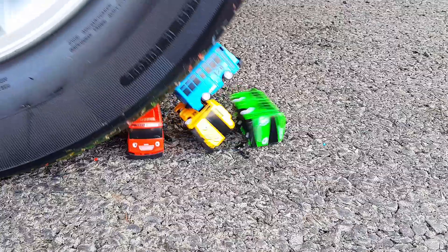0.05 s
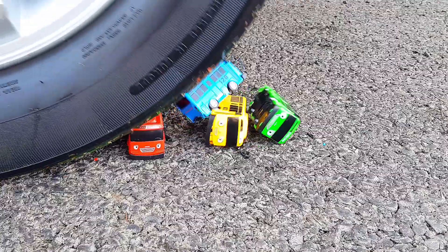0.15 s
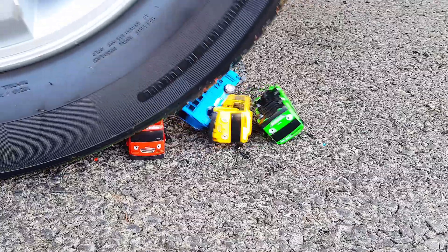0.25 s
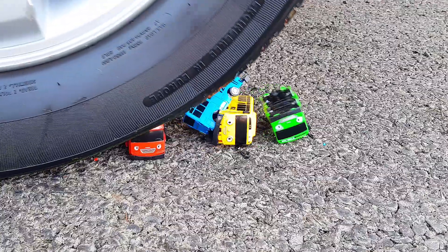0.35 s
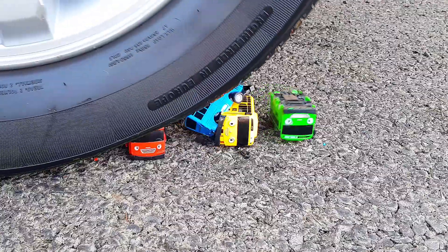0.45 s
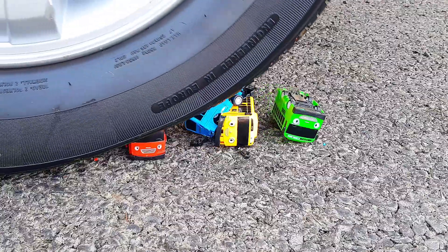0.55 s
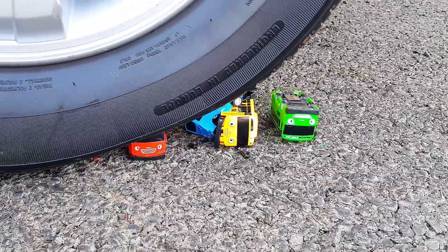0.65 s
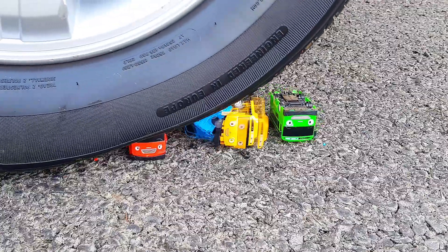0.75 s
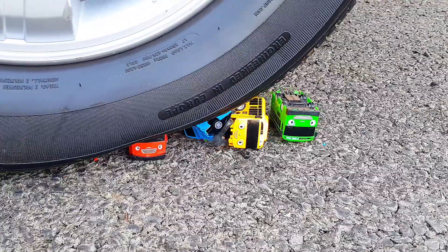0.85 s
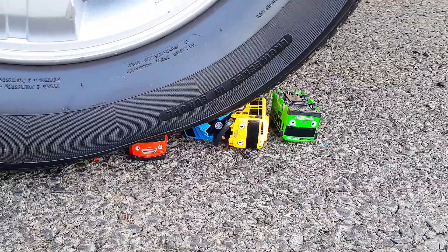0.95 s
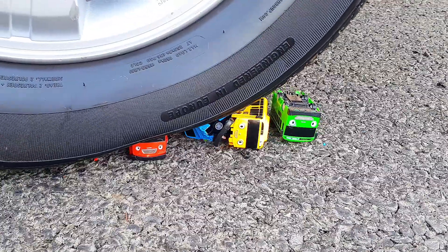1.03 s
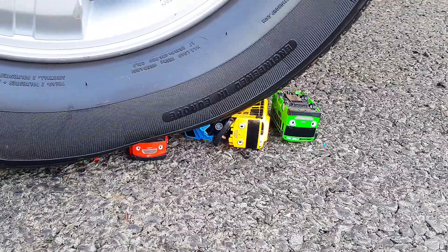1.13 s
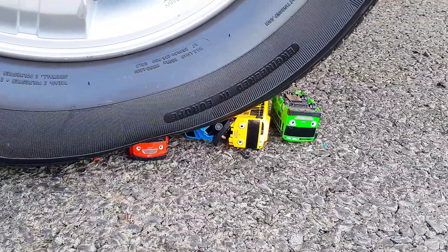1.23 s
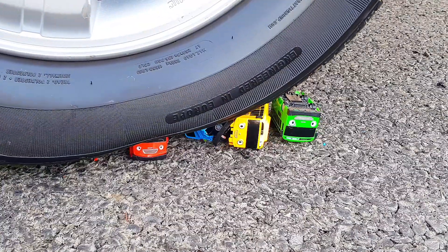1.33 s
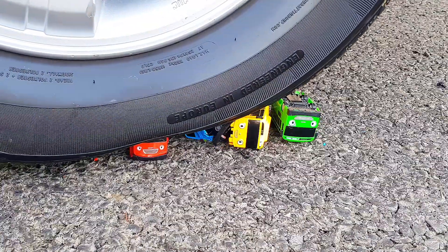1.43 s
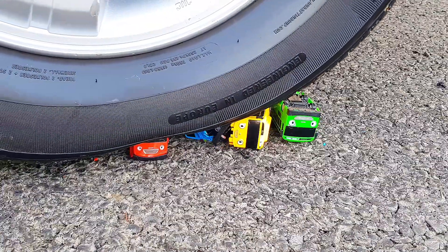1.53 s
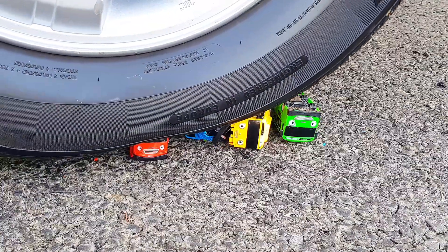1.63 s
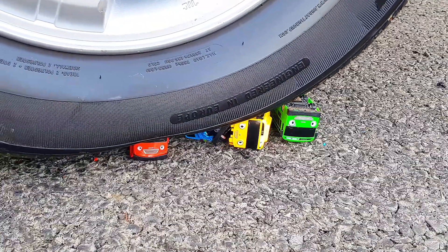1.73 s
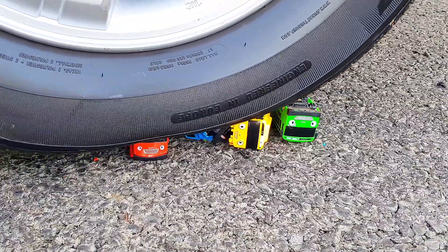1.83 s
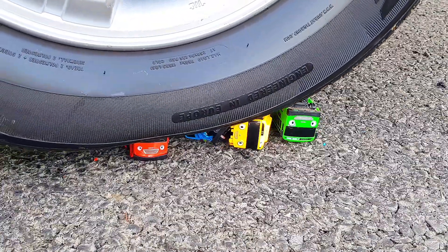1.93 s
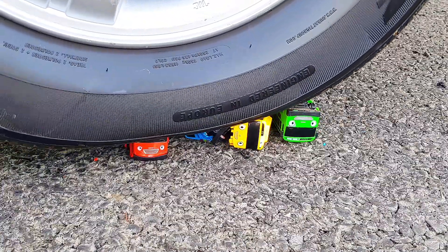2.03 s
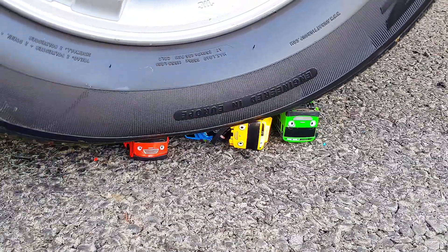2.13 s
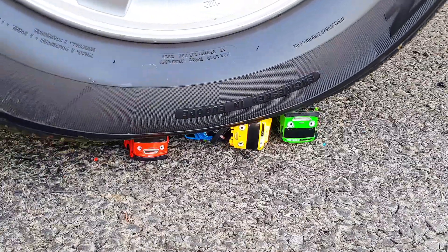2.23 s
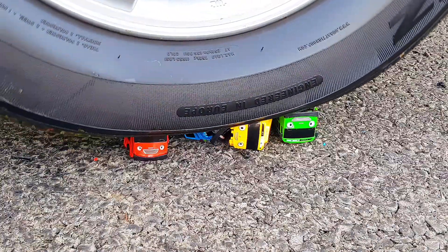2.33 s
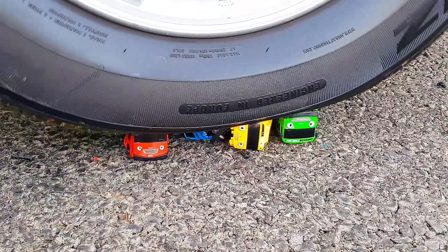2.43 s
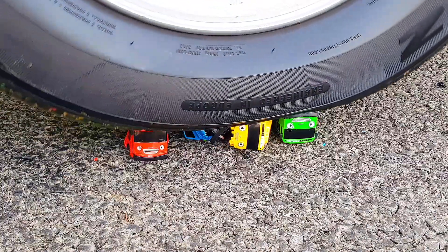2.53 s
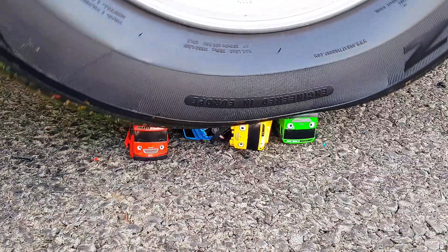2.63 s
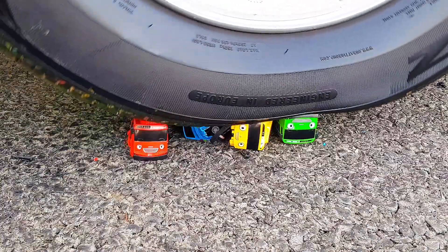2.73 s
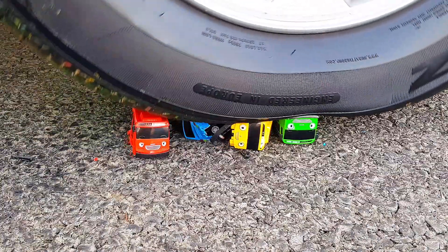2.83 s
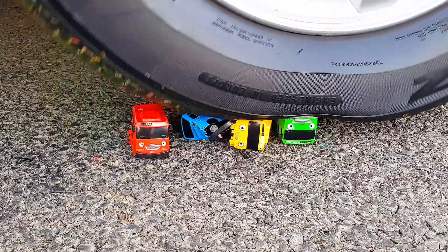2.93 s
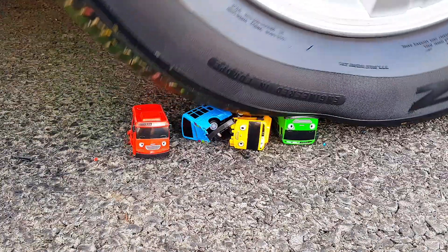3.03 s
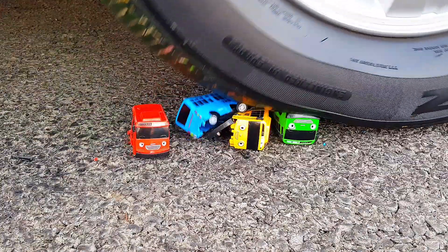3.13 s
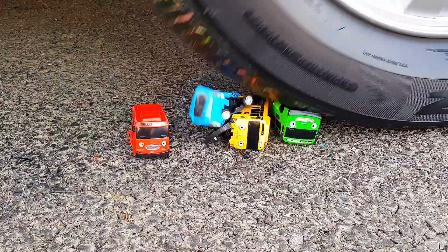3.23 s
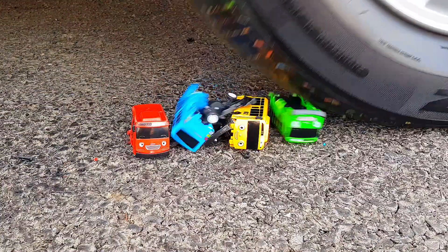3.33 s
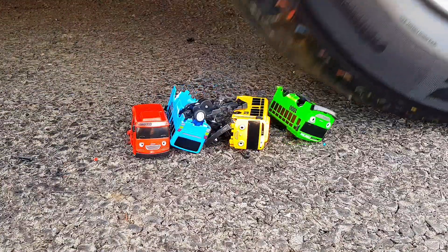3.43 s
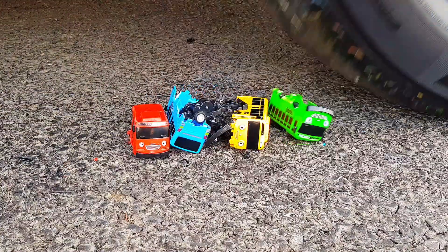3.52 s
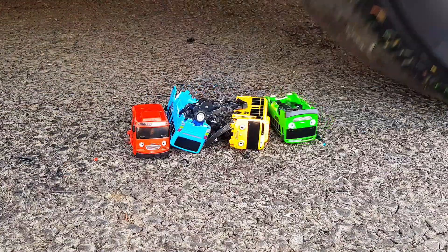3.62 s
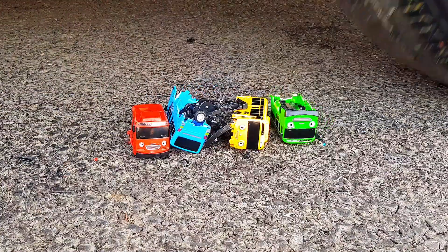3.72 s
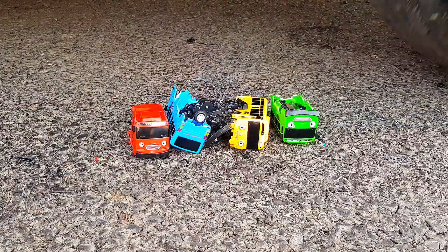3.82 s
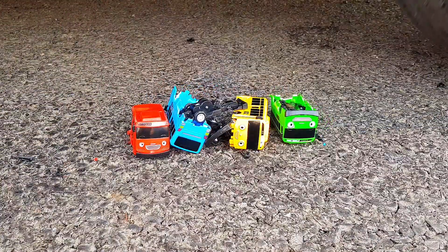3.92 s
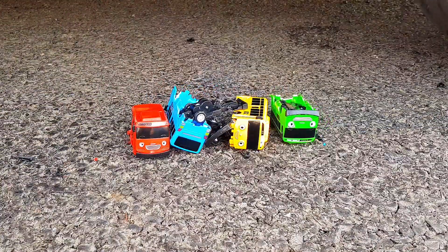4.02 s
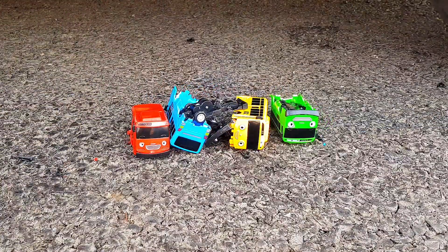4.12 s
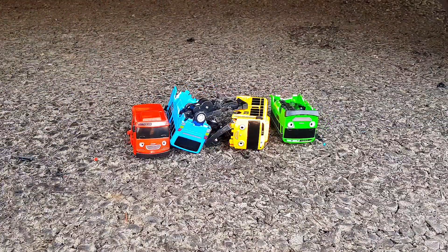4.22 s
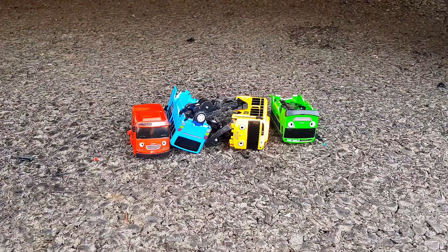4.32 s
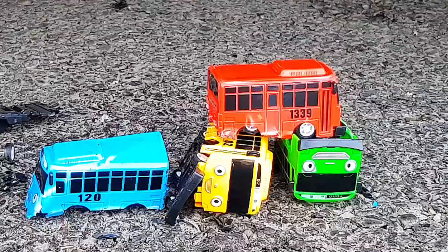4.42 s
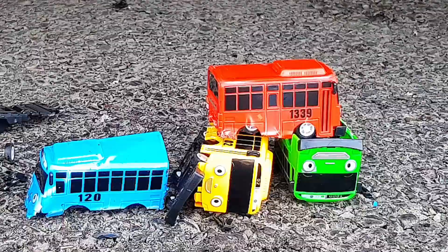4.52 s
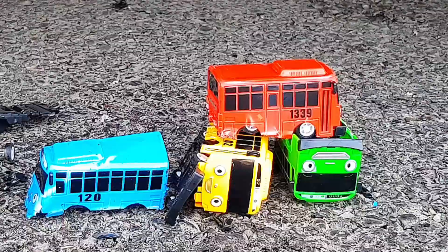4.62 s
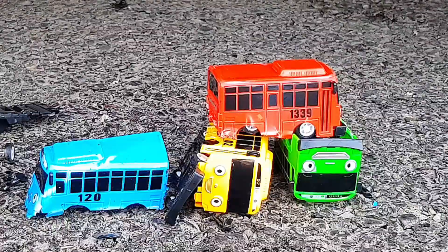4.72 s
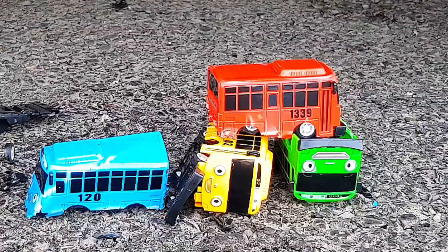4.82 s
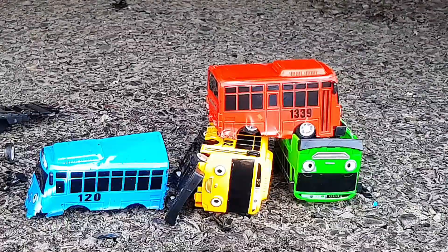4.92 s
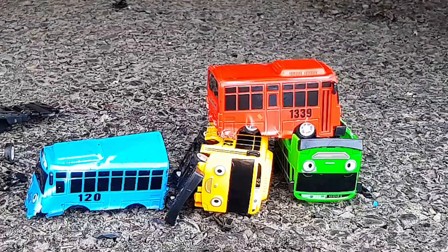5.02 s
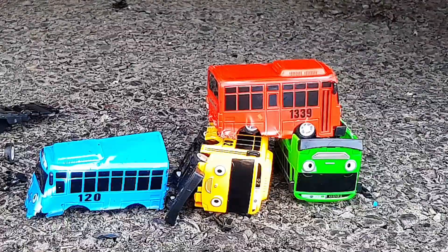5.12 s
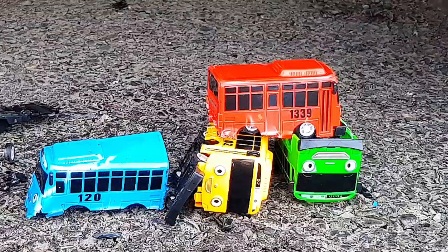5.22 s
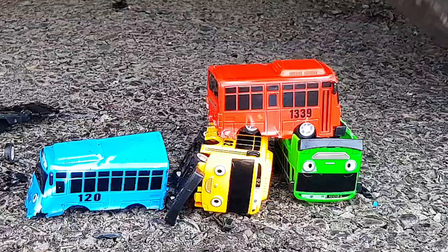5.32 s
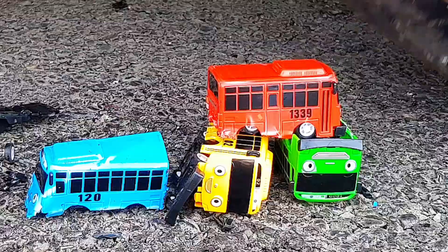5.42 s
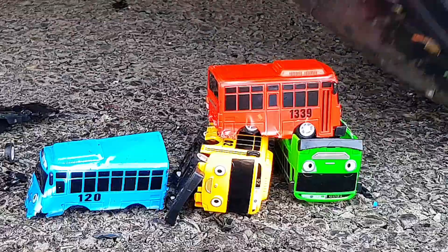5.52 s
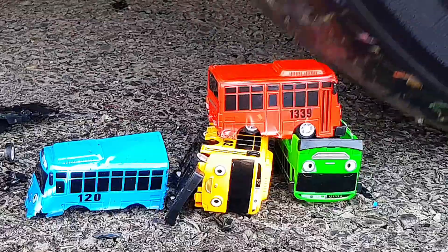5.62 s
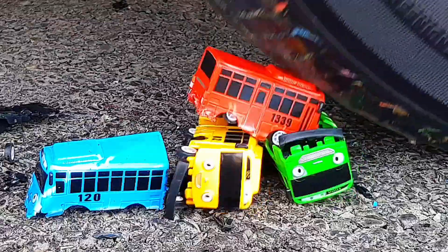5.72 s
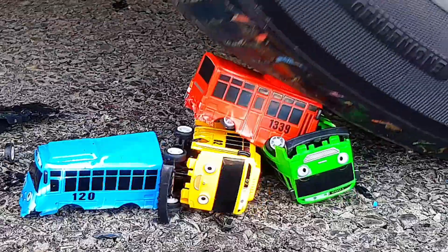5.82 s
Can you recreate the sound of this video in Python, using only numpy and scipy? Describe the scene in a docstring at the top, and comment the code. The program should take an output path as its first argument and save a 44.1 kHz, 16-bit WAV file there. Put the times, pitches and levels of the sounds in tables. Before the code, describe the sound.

Close to the microphone outdoors, hard plastic toys crack and grind under a slow car tyre in a dense first second. The breaking thins to sparse pops, over low engine hum, then a second cluster of sharp snaps comes after three seconds. A thin squeal and abruptly stronger fan noise follow, and crunching returns at the very end.

```python
"""Plastic toy buses snap and grind on asphalt as a car tyre rolls slowly over them, close to the microphone.
Each snap is a decaying noise burst with panel and shard tones, and the underbody throws it back as diffuse
echo. The grinding is dense random fractures and contacts; damped modes sound the caving shells and dull low
thumps. The engine hums as two crankshaft orders, in filtered noise of fan and exhaust; the wash falls after the
start and rises again, and the background steps up at 4.36 s. Rubber creaks, faint ticks, a faint whine and one
thin squeal are also heard."""
import sys
import numpy as np
from scipy import signal
from scipy.fft import rfft, irfft, next_fast_len
from scipy.io import wavfile
from scipy.ndimage import map_coordinates

SR = 44100
rng = np.random.default_rng(int(sys.argv[2]) if len(sys.argv) > 2 else 0)


def wav_record(signal):
    """Record a signal, one row per channel, as 16-bit PCM in the file named by sys.argv[1]."""
    frames = np.transpose(np.atleast_2d(signal))
    bounded = np.clip(frames, -1, 1)
    # unit amplitude maps onto the largest positive 16-bit level
    quanta = np.round(bounded * 32767).astype(np.int16)
    wavfile.write(sys.argv[1], SR, quanta)


N = 258426
TIME = np.arange(N) / SR

# snaps of the plastic: start_s, base level_db, burst t60_s, ring_hz,
# tilt_db (added to the top band, taken from the second), hollow_db (lowest band against the base level)
SNAPS = [(0, -26.5, 0.017, 2960, -8.5, -24), (0.0912, -39.5, 0.061, 1750, -12, -4),
         (0.123, -30.5, .016, 1466, -12.5, -18), (0.1453, -32.5, 0.025, 1930, -10, -22),
         (.151, -34.5, 0.039, 1900, 3, -23), (0.1762, -32, 0.018, 1480, -4, -24),
         (0.199, -38.5, 0.032, 1840, -14, -4), (.2926, -20.5, 0.038, 1820, -1.5, -13),
         (0.3754, -33, 0.0029, 3520, 14, -4.5), (.428, -47.5, 0.04, 2190, -11, -12),
         (.452, -34, 0.038, 2000, -1, -4.5), (0.4644, -39, 0.022, 2150, -12.5, -20),
         (0.4898, -34, 0.029, 2160, -1, -26), (.5075, -25, 0.018, 4380, 5, -11.5),
         (.5338, -31, 0.015, 2210, 1.5, -8.5), (0.6, -38.5, 0.016, 4430, -3, -2.5),
         (0.6623, -20.5, 0.011, 1870, 1, -10), (0.6766, -34.5, 0.016, 2100, -4, -21),
         (.7022, -43.5, .017, 2840, 3, -16), (0.7446, -39.5, 0.015, 1660, -12, -24),
         (.786, -36.5, 0.012, 1760, -6.5, 0), (0.8052, -21, 0.027, 1770, -4, -6),
         (.808, -21.5, .046, 1654, 2, -6.5), (0.8788, -35, 0.014, 4940, 11, -9.5),
         (.9271, -55, .016, 990, 13, -10), (1.139, -41, 0.019, 4470, 3, -6),
         (1.629, -33, 0.011, 1950, -6.5, -16), (2.2941, -56.5, .015, 2920, 0.5, 0.5),
         (2.316, -58, .013, 4150, -2, -6), (2.3786, -28.5, 0.013, 2560, 3.5, 2.5),
         (2.465, -47, 0.0088, 2360, 1, -17), (2.4914, -47, 0.0075, 1280, -10.5, 7),
         (2.664, -26.5, 0.011, 1905, 0, -14.5), (2.7543, -38.5, 0.015, 1820, -5, -1),
         (2.8063, -41, 0.019, 2290, -5, -6), (2.8456, -24, 0.0081, 2600, 2.5, 1),
         (2.865, -33.5, .02, 2670, .5, 2), (2.9244, -51, 0.037, 2420, 1, -6.5),
         (2.9738, -53, 0.014, 4100, 4, -14), (3.0025, -56, .026, 2170, 0, -10),
         (3.1265, -19.5, .025, 1760, -5, -14), (3.1502, -30, 0.025, 1480, -6.5, -8),
         (3.173, -43, .027, 1670, -9, -4.5), (3.1977, -32.5, 0.05, 2185, -3, -22),
         (3.2581, -44.5, .059, 2170, -10, -18), (3.283, -27, 0.015, 1314, -1.5, -8.5),
         (3.315, -43, 0.027, 4600, 4, -15), (3.3526, -30, 0.034, 4480, 0.5, -25),
         (3.444, -40.5, 0.023, 1960, -11, -22), (3.694, -50, 0.055, 1950, -9.5, -14),
         (3.8869, -30, 0.023, 2021, 6, -36), (5.683, -35.5, 0.062, 1553, -5, -1.5),
         (5.706, -25.5, 0.021, 1920, -1.5, -18), (5.7243, -24.5, 0.019, 2040, -8, -15),
         (5.7434, -35, 0.076, 3610, -3, -7), (5.8023, -40, .008, 1530, -6, -19),
         (5.8132, -18.5, 0.031, 3640, 0.5, -8.5), (5.848, -26.5, .015, 4570, 9, -29)]
# bands of a snap, hollow to fizz: low_hz, high_hz
SNAP_BANDS = [(390, 850), (1040, 2500), (2650, 7300), (8600, 16000)]
BAND_FILTERS = [signal.butter(4, band, "band", fs=SR, output="sos") for band in SNAP_BANDS]
# underbody echo in each band: side_share (0-1, energy that differs between the ears), echo_db, echo_t60_s
UNDERBODY_ECHO = [(.06, -15, .08), (.1, -16, .075), (.26, -19, .058), (.45, -21, .048)]
# small, high-ringing panels snap with a harder edge: ring_hz, third_band_db
HARD_EDGE = [(1400, -3), (1850, 2), (3000, 3), (4500, 5.5)]
# balance of a snap in each band: left_over_right_db
SNAP_LEFT_DB = [2, 1.7, 4.1, 1]
# splinters trail each snap, longer after a long tear: level (dB), base t60 (s), added t60 per burst t60
SPLINTER_DB, SPLINTER_T60, SPLINTER_PER_T60 = -25.5, 0.057, 2.5
# the panel's tone in the tear, louder in dull snaps: level at no tilt (dB), fall per dB of tilt
PANEL_DB, PANEL_PER_TILT = -7.5, 0.1

# strokes of grinding plastic: start_s, end_s, level_db before the taper, treble_db (shelf before levelling)
GRIND_STROKES = [(0, 0.104, -33.5, 2), (0.099, 0.162, -25, 0), (0.157, 0.214, -27, -8),
                 (0.217, .31, -40, -6), (0.321, 0.36, -32, 9), (0.37, 0.397, -38, 11),
                 (0.416, 0.47, -50, -3), (.512, 0.532, -30.5, 25), (.612, 0.721, -45, 10),
                 (.812, .839, -34.5, 9), (2.739, 2.896, -43.5, 6), (3.09, 3.114, -42.5, 7),
                 (3.132, 3.296, -36, -1), (3.3, 3.475, -37.5, 3.5), (3.452, 3.526, -50, -1),
                 (3.894, 3.946, -47, 16), (4.358, 4.389, -40.5, -10), (5.203, 5.226, -42.5, 3),
                 (5.682, 5.756, -25.5, 0), (5.813, 5.84, -25.5, -5)]
# relative spectrum of grinding plastic: frequency_hz, density_db
GRIND_SPECTRUM = [(180, -42), (300, -24), (842, -20), (1120, -20), (1280, -23.5), (1460, -6), (2210, -6.5),
                  (2610, -18.5), (3290, -6.5), (4520, -13), (6960, -23.5), (7690, -23), (10900, -23),
                  (14200, -26.5), (16000, -40.5)]

# engine hum: time_s, nominal turns_per_s, hum_db before wobble, third_over_second_order_db before wobble
ENGINE_ORDERS = [(0, 25.8, -44, -7), (.9, 23, -49.5, 8), (1.2, 27.4, -53, -7), (1.4, 25.3, -42.5, 1),
                 (1.95, 26.3, -54, 9.5), (2.1, 27, -46.5, 1), (2.45, 26, -48.5, 0), (2.8, 23, -61, 8),
                 (3.1, 25.5, -58, -14), (4.3, 24.5, -52.5, 0), (4.8, 24.3, -58, 2), (5, 24.2, -43, -4),
                 (5.86, 24.3, -50.5, -4)]
# exhaust rumble: time_s, level_db before wobble
EXHAUST_LEVEL = [(0, -36.5), (.6, -43), (.85, -38), (1.1, -48.5), (1.45, -42), (1.9, -49.5), (2.3, -43),
                 (2.8, -50), (3.4, -46.5), (4.3, -41.5), (4.7, -47.5), (5.1, -43), (5.86, -41.5)]
# relative spectrum of the exhaust rumble: frequency_hz, density_db
RUMBLE_SPECTRUM = [(12, -50.5), (20, -9), (36, -11), (64, 0.5), (83, -1.5), (123, -6), (156, -6),
                   (193, -11.5), (271, -15.5), (344, -20), (400, -21), (520, -46.5), (880, -120)]
# fan wash, which falls after the start and rises again; the background steps up at 4.36 s: time_s, level_db
# before flutter
FAN_LEVEL = [(0, -43.5), (1.05, -54.5), (1.8, -54), (2.7, -51), (3.7, -46.5), (4.3, -47.5), (4.4, -43),
             (5.1, -42), (5.86, -45.5)]
# relative spectrum of the fan wash: frequency_hz, density_db
WASH_SPECTRUM = [(110, -33), (180, -18.5), (234, -2), (258, -10.5), (341, -3), (376, -6), (522, -5),
                 (614, -1), (736, -12.5), (798, -11), (1180, -15), (2470, -18), (3370, -24.5), (4310, -24),
                 (9000, -35.5), (11700, -62.5), (19800, -120)]
# relative spectrum of the hiss above the wash: frequency_hz, density_db
HISS_SPECTRUM = [(4710, -41), (8000, -2.5), (9190, -8.5), (11900, -5), (13600, -1), (14600, -5),
                 (16000, -10)]
# hiss against the mean wash (dB), and its swing in dB per dB of wash
HISS_DB, HISS_GROWS = -13.5, 1.09
# stereo width of noise: frequency_hz, side_over_mid_db
STEREO_WIDTH = [(60, -11.5), (500, -6.5), (2000, 0), (4500, -2), (9000, 1)]

# random ticks while the wheel's weight is on the toys: time limits (s), highest level and tilt (dB)
TICKS_FROM, TICKS_TO = 0.55, 3.05
TICK_DB, TICK_TILT_DB = -64.5, 2

# dull low thumps: start_s, gain_db on modes and thud
DULL_THUMPS = [(.812, 5), (4.36, -8.5)]
# modes of a thump's brief low ring: mode_hz, level_db before the thump's gain, t60_s
THUMP_MODES = [(105.2, -25.5, 0.26), (151.3, -21, 0.086), (270.4, -15, 0.064), (430, -25, 0.086)]
# relative spectrum of the unpitched thud: frequency_hz, density_db
THUD_SPECTRUM = [(50, -24.5), (100, -5), (170, -0.5), (330, -4), (650, -11.5), (1100, -26), (2500, -69)]
# thud: noise level before its envelope and the thump's gain (dB), t60 (s), rise time constant (s)
THUD_DB, THUD_T60, THUD_RISE_S = -27.5, 0.12, 0.0036

# creaks of rubber slipping on plastic: start_s, end_s, nominal slips_per_s, level_db before the taper
RUBBER_CREAKS = [(1.412, 1.471, 170, -50.5), (1.458, 1.518, 105, -46.5), (2.539, 2.62, 230, -43.5)]
# relative spectrum of a creak: frequency_hz, density_db
CREAK_SPECTRUM = [(250, -31.5), (600, -1), (1300, 0.5), (2500, -1), (3600, -9), (4700, -4.5), (6500, -31),
                  (16000, -23)]

# a toy body caves in: start_s, gain_db on all modes, lowest_mode_hz
CAVE_INS = [(1.629, -22, 657.5), (2.379, -22, 643), (2.846, -21.5, 468), (3.128, -20, 918)]
# modes of a hollow toy body: multiple of the lowest mode, level_db before the cave-in's gain, t60_s
SHELL_MODES = [(1, 3, 0.05), (1.4, -9.5, 0.023), (2.08, -4, 0.011), (3.22, -10.5, 0.027), (5.65, 0, 0.012)]

# microphone response: frequency_hz, gain_db
MICROPHONE_RESPONSE = [(100, 1), (6500, -1.5), (7400, -6), (8100, -9), (9000, -6), (10500, 1), (15500, 0.5),
                       (16600, -18)]
TOP_HZ = 16700  # centre of the steep cut-off


def amp(db):
    """Decibel law: level to amplitude ratio."""
    return 10 ** (np.asarray(db) / 20)


def unit(x):
    """Mean-square normalisation: scale to rms 1."""
    return x / np.sqrt(np.mean(x ** 2) + 1e-20)


def curves(rows):
    """Linear interpolation: one value per sample for each column after the time."""
    s, *columns = np.transpose(rows)
    return [np.interp(TIME, s, column) for column in columns]


def wobble(rate):
    """Band-limited fluctuation: a spline through random knots, rate of them a second."""
    knots = rng.standard_normal(int(N * rate / SR) + 4)
    return map_coordinates(knots, [TIME * rate])


def colour(x, points):
    """Linear filtering: a zero-phase gain through (Hz, dB) points on a log frequency axis."""
    size = next_fast_len(x.shape[-1] + 8192)
    hz, db = np.transpose(points)
    log_hz = np.log(np.fft.rfftfreq(size, 1 / SR) + 1)
    gain = amp(np.interp(log_hz, np.log(hz), db))
    return irfft(rfft(x, size) * gain, size)[..., :x.shape[-1]]


def pan(left_db):
    """Interaural level difference: half the dB goes to each channel, with opposite signs."""
    return amp(np.array([[left_db], [-left_db]]) / 2)


def widen(pair):
    """Mid-side stereo: two unrelated signals give narrower bass and wide treble."""
    mid, side = pair[0], colour(pair[1], STEREO_WIDTH)
    return np.array([mid + side, mid - side])


def rush(spectrum):
    """Broadband turbulence model: coloured stereo noise of rms 1."""
    return unit(widen(colour(rng.standard_normal((2, N)), spectrum)))


def fade(t, t60):
    """Exponential damping: 60 dB is lost in t60."""
    return np.exp(-np.log(1000) * t / t60)


def add(track, s, sound):
    """Superposition: mix a sound into the track at time s."""
    start = int(np.clip(round(s * SR), 0, N - 1))
    track[:, start:start + sound.shape[1]] += sound[:, :N - start]


def fracture(t, t60, ring_hz, ring_db, shard_db, shard_t60, count=14):
    """Impulsive release of strain: a tearing noise burst with damped tones of panel and shards."""
    tear = fade(t, t60) + amp(1) * fade(t, 0.0026)
    burst = rng.standard_normal(len(t)) * tear
    panel_tone = np.sin(2 * np.pi * ring_hz * t + rng.uniform(0, 2 * np.pi))
    panel = amp(ring_db) * panel_tone * fade(t, t60 + 0.0076)

    shard_hz = np.exp(rng.uniform(np.log(2700), np.log(15500), (count, 1)))
    life = shard_t60 * np.sqrt(2000 / shard_hz)  # small pieces ring higher and shorter
    shard_gain = amp(shard_db + rng.normal(0, 3.9, (count, 1)))
    shard_phase = rng.uniform(0, 2 * np.pi, (count, 1))
    shards = shard_gain * np.sin(2 * np.pi * shard_hz * t + shard_phase) * fade(t, life)

    opening = 1 - np.exp(-t / (0.016 * t60))  # a long tear also takes longer to open
    return (burst + panel + shards.sum(0)) * opening


def snap(level_db, t60, ring_hz, tilt_db, hollow_db):
    """Brittle fracture with diffuse reflection: bands have their own level, echo and stereo share."""
    t, first = TIME[:SR // 12], SR // 100  # each band is levelled over its first 10 ms
    edge_db = np.interp(ring_hz, *np.transpose(HARD_EDGE))
    levels = level_db + np.array([hollow_db, -tilt_db, edge_db, tilt_db])
    panel_db = PANEL_DB - PANEL_PER_TILT * tilt_db
    front = fracture(t, t60, ring_hz, ring_db=panel_db, shard_db=-16.5, shard_t60=0.044)
    aside = fracture(t, t60, ring_hz, ring_db=-18, shard_db=-14.0, shard_t60=0.066)

    scatter = rng.standard_normal((2, len(t)))
    crumbs = unit(rng.standard_normal((2, len(t))) * rng.exponential(size=len(t)))
    splinters = amp(SPLINTER_DB) * crumbs * fade(t, SPLINTER_T60 + SPLINTER_PER_T60 * t60)

    sound = np.zeros((2, len(t)))
    for sos, echo_row, db, left_db in zip(BAND_FILTERS, UNDERBODY_ECHO, levels, SNAP_LEFT_DB):
        side_share, echo_db, echo_t60 = echo_row
        echo = scatter * amp(echo_db) * fade(t, echo_t60)
        mid, side = signal.sosfilt(sos, [front, aside] + splinters + echo)
        mid = mid * np.sqrt((1 - side_share) / np.mean(mid[:first] ** 2))
        side = side * np.sqrt(side_share / np.mean(side[:first] ** 2))
        sound += amp(db) * np.array([mid + side, mid - side]) * pan(left_db)
    return sound


def cracks():
    """Successive brittle failure: the shells give way one snap after another."""
    track = np.zeros((2, N))
    for s, *shape in SNAPS:
        add(track, s, snap(*shape))
    return track * amp(-0.78)


def grains(rate, size_db, grain_t60):
    """Shot noise: energies of dense, uneven tiny fractures add into a noise envelope."""
    sizes = amp(size_db * np.minimum(rng.exponential(size=N), 3))
    hits = (rng.random(N) < rate / SR) * sizes
    power = signal.fftconvolve(hits ** 2, fade(TIME[:SR // 20], grain_t60) ** 2)[:N]
    return np.sqrt(np.abs(power)) * rush(GRIND_SPECTRUM)


def rattle(rate, centre_hz, spread, t60):
    """Repeated impact excitation: loose plastic parts chatter, each contact with its own short ring."""
    t, count = TIME[:SR // 25], int(rate * N / SR)
    pitch, size, side = rng.standard_normal((count, 3)).T[:, :, None]
    ring_hz = centre_hz * np.exp(spread * pitch)
    pings = amp(5.2 * size) * np.sin(2 * np.pi * ring_hz * t) * fade(t, t60)
    at = rng.integers(0, N, (count, 1)) + np.arange(len(t))
    ears = [np.bincount(at.ravel(), (pings * amp(ear * side)).ravel(), N)[:N] for ear in (2, -2)]
    return unit(np.array(ears))


def grinding():
    """Frictional micro-fracture: pressed plastic scrapes the asphalt, crazes and rattles."""
    crazing = grains(rate=520, size_db=6.0, grain_t60=0.038)
    chatter = rattle(rate=260, centre_hz=1993, spread=0.34, t60=0.03)
    crunch = crazing + amp(5.5) * chatter
    treble = signal.sosfilt(signal.butter(1, 6000, "high", fs=SR, output="sos"), crunch)
    track = np.zeros((2, N))
    for start, end, db, treble_db in GRIND_STROKES:
        first = int(np.clip(start * SR, 0, N - SR // 200))
        span = slice(first, max(int(end * SR), first + SR // 200))  # at least 5 ms
        stroke = unit(crunch[:, span] + (amp(treble_db) - 1) * treble[:, span])
        add(track, start, amp(db) * stroke * signal.windows.tukey(stroke.shape[1], 0.2))
    return track * pan(0.93)


def engine():
    """Harmonic excitation by rotation: crankshaft orders two and three, over exhaust and fan noise."""
    speed, hum_db, third_db = curves(ENGINE_ORDERS)
    turn = 2 * np.pi * np.cumsum(speed * (1 + 0.0093 * wobble(12))) / SR
    second = amp(-third_db / 2 + 1.5 * wobble(11)) * np.sin(2 * turn)
    third = amp(third_db / 2 + 2.4 * wobble(9)) * np.sin(3 * turn)
    hum = np.sqrt(2) * amp(hum_db) * (second + third)

    (rumble_db,), (wash_db,) = curves(EXHAUST_LEVEL), curves(FAN_LEVEL)
    rumble = amp(rumble_db + 1.5 * wobble(8)) * rush(RUMBLE_SPECTRUM)
    flutter_db = 0.6 * wobble(10)
    wash = amp(wash_db + flutter_db) * rush(WASH_SPECTRUM)
    mean_db = wash_db.mean()
    hiss_db = mean_db + HISS_DB + HISS_GROWS * (wash_db - mean_db)
    hiss = amp(hiss_db) * rush(HISS_SPECTRUM)
    return hum + rumble + (wash + hiss) * pan(1.2)


def whine(hz=4450):
    """Random frequency modulation: a faint, fuzzy whine from the engine bay comes and goes."""
    phase = 2 * np.pi * np.cumsum(hz + 100 * wobble(300)) / SR
    level_db = -74 + 2.5 * wobble(3) + 2 * wobble(20)
    return amp(level_db) * np.sin(phase)


def ticks(count=8):
    """Sporadic strain release: plastic ticks faintly at random moments."""
    track = np.zeros((2, N))
    for when, size, pitch in rng.random((count, 3)):
        s = TICKS_FROM + when * (TICKS_TO - TICKS_FROM)
        ring_hz = 2200 * 2 ** pitch
        tick = snap(TICK_DB - 8 * size, t60=0.012, ring_hz=ring_hz, tilt_db=TICK_TILT_DB, hollow_db=-14)
        add(track, s, tick)
    return track


def dull_thumps():
    """Damped modes with a noise transient: a dull thump with a brief low ring."""
    track, t = np.zeros((2, N)), TIME[:SR // 3]
    modes = sum(amp(db) * np.sin(2 * np.pi * hz * t) * fade(t, t60) for hz, db, t60 in THUMP_MODES)
    low_ring = modes * (1 - np.exp(-t / 0.012))
    thud_envelope = fade(t, THUD_T60) * (1 - np.exp(-t / THUD_RISE_S))
    for s, db in DULL_THUMPS:
        noise = unit(colour(rng.standard_normal(len(t)), THUD_SPECTRUM))
        thud = amp(THUD_DB) * noise * thud_envelope
        add(track, s, amp(db) * (low_ring + thud) * pan(0.88))
    return track


def creaks():
    """Stick-slip friction: rubber slips at an uneven rate, each slip a tiny decaying rasp."""
    track, rasp = np.zeros((2, N)), rush(CREAK_SPECTRUM)
    for start, end, rate, db in RUBBER_CREAKS:
        first = int(start * SR)
        span = slice(first, max(int(end * SR), first + SR // 100))  # at least 10 ms
        slip_phase = np.cumsum(rate * amp(3.2 * wobble(60)[span]) / SR) % 1
        since_slip = slip_phase / rate
        stroke = unit(rasp[:, span] * fade(since_slip, 0.02))
        add(track, start, amp(db) * stroke * signal.windows.tukey(stroke.shape[1], 0.8))
    return track * pan(1.6)


def rings():
    """Modal vibration of a shell: a caving toy body rings at a pitch set by what is left of it."""
    track, t = np.zeros((2, N)), TIME[:SR // 6]
    for s, db, hz in CAVE_INS:
        ring = np.zeros(len(t))
        for multiple, mode_db, t60 in SHELL_MODES:
            ring += amp(mode_db) * np.sin(2 * np.pi * hz * multiple * t) * fade(t, t60)
        add(track, s, amp(db) * ring * pan(1.6))
    return track


def squeal(start=4.262, peak=4.343, hz=12420, db=-33):
    """Friction-driven oscillation: a thin, brief squeal swells and stops, as from a brake pad."""
    times = [start - 0.05, start, peak - 0.02, peak, peak + 0.025]
    swell = amp(np.interp(TIME, times, [-100, -32, -2, 1, -50], right=-100))
    phase = 2 * np.pi * np.cumsum(hz * (1 + 0.002 * wobble(300))) / SR
    return amp(db) * swell * np.sin(phase) * pan(2.4)


def scene():
    """Superposition of sources: breaking toys in front of the running car."""
    breaking = cracks() + grinding() + ticks() + rings()
    background = engine() + whine()
    return breaking + background + dull_thumps() + creaks() + squeal()


def record(dry):
    """Transducer response: a notch in the treble, clipping at full scale, then a steep band end."""
    heard = np.clip(colour(dry, MICROPHONE_RESPONSE), -1, 1)
    return colour(heard, [(TOP_HZ - 100, 0), (TOP_HZ + 100, -120)])


dry = scene()
out = record(dry)
wav_record(out)
```